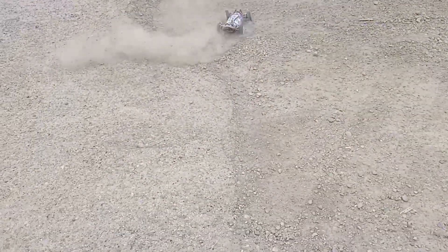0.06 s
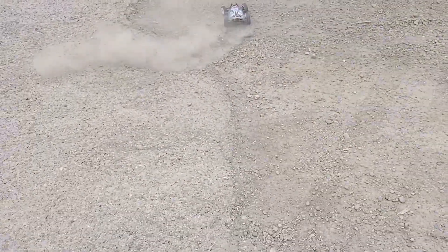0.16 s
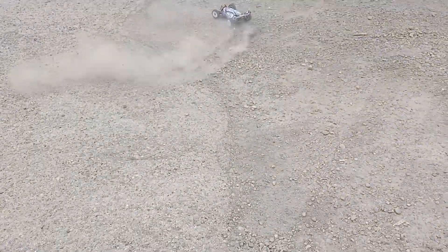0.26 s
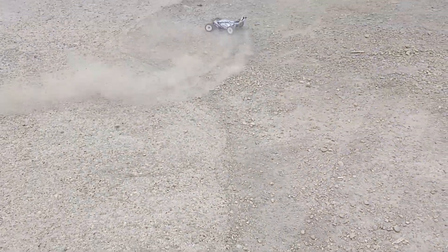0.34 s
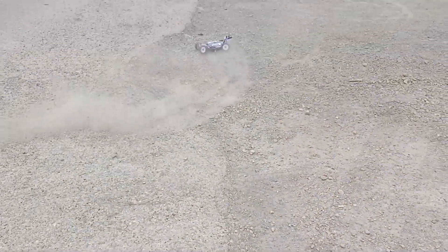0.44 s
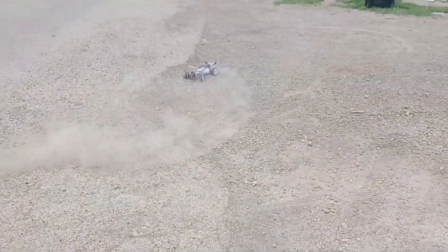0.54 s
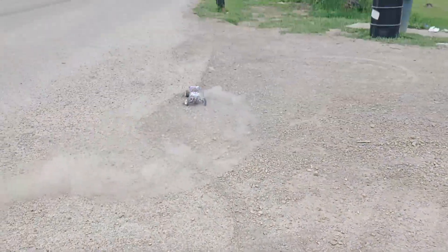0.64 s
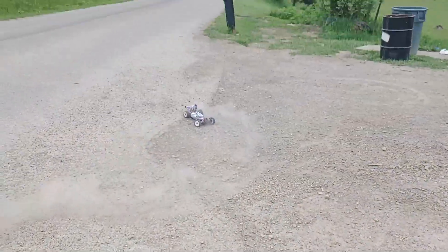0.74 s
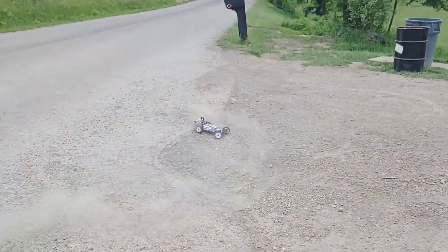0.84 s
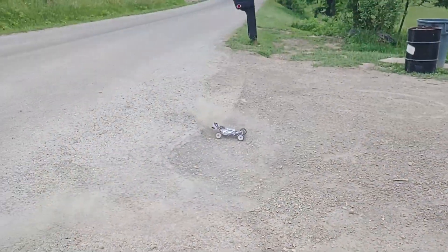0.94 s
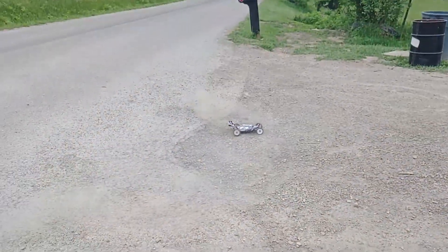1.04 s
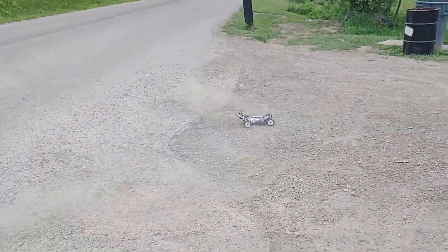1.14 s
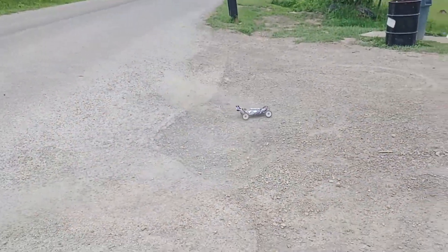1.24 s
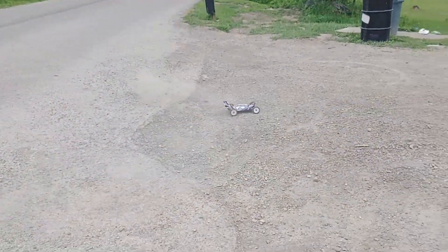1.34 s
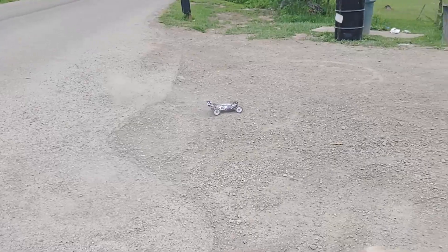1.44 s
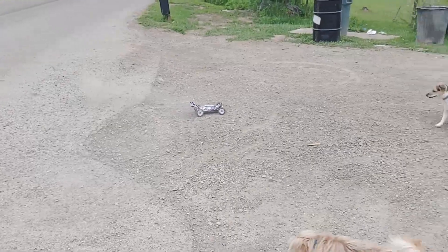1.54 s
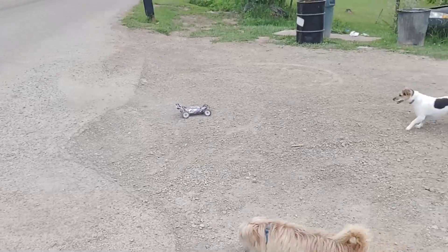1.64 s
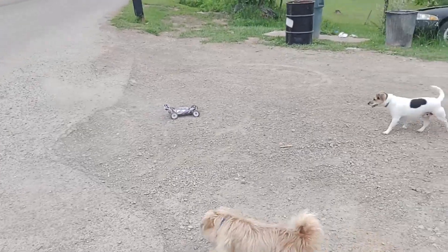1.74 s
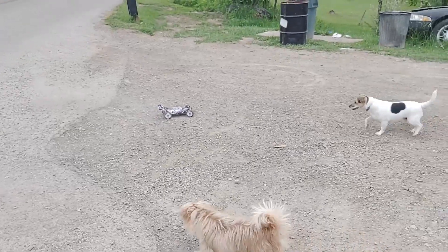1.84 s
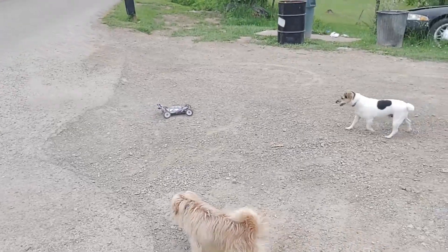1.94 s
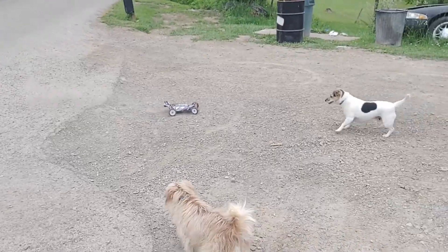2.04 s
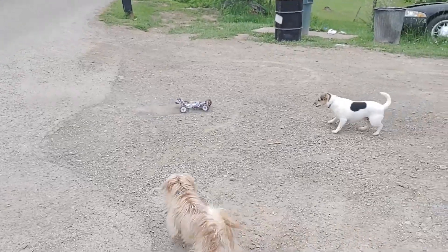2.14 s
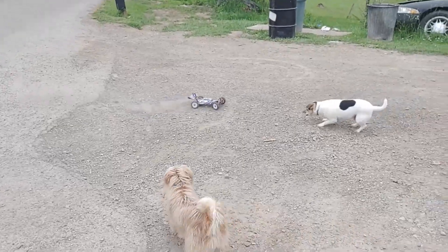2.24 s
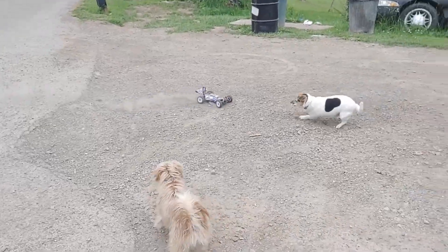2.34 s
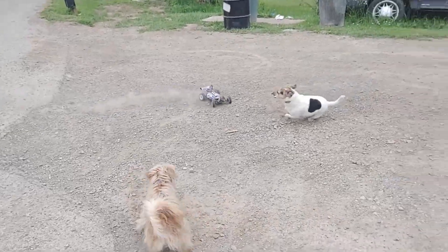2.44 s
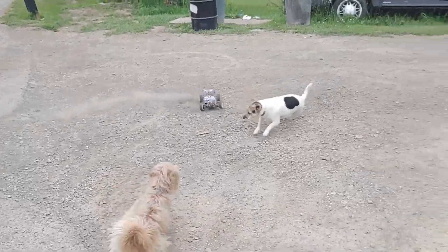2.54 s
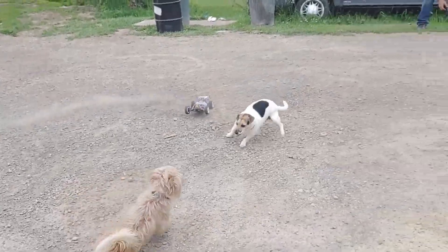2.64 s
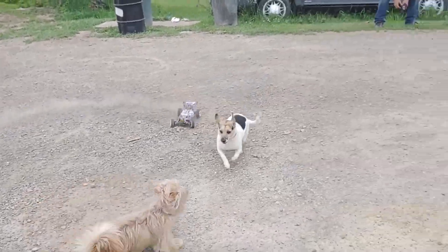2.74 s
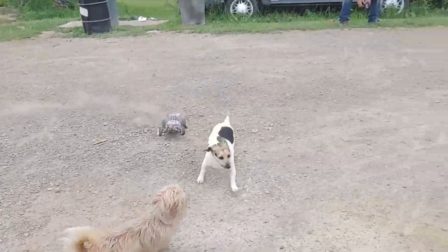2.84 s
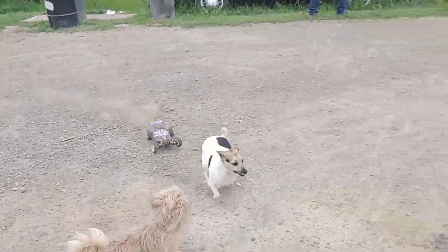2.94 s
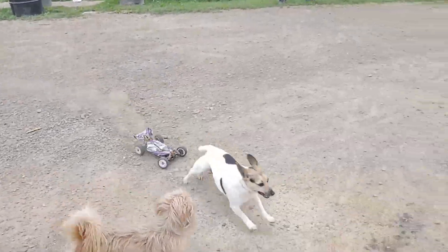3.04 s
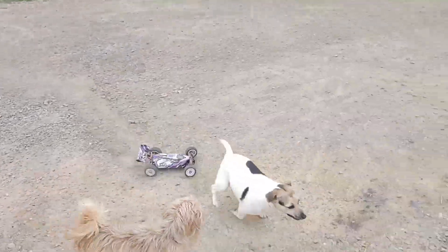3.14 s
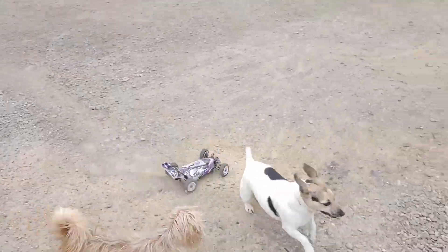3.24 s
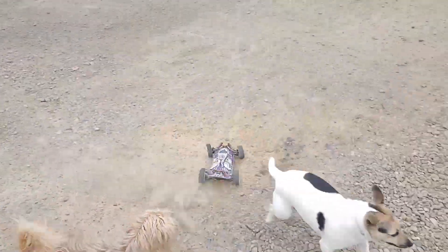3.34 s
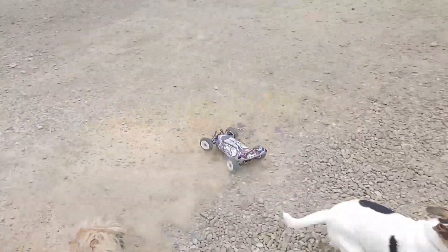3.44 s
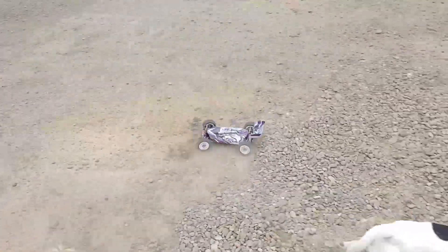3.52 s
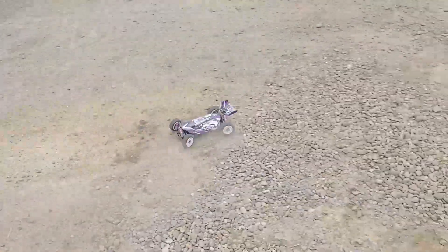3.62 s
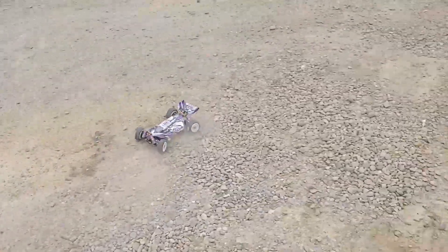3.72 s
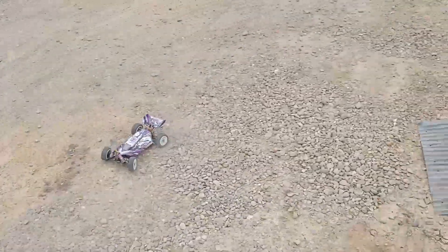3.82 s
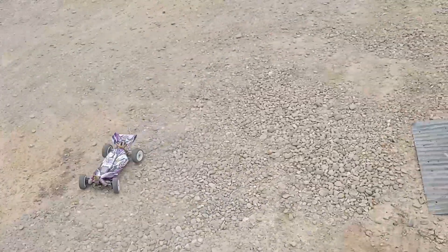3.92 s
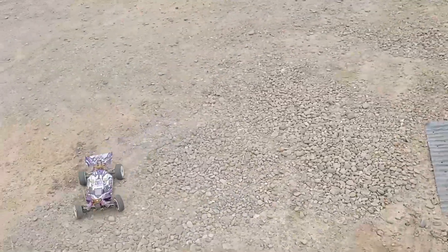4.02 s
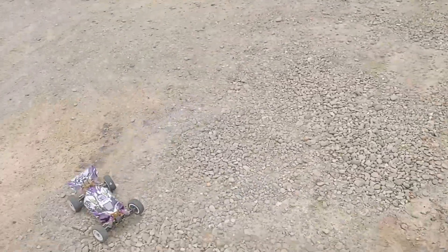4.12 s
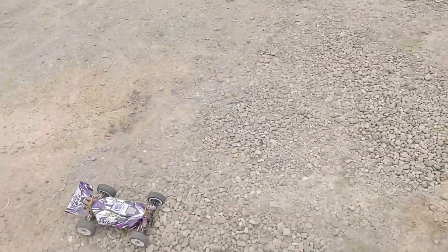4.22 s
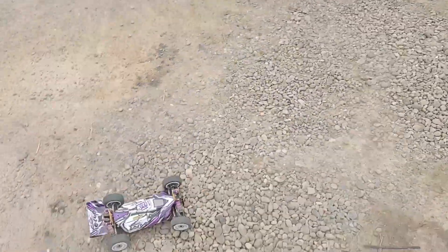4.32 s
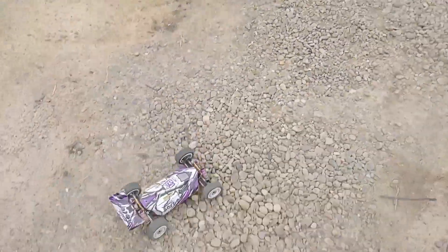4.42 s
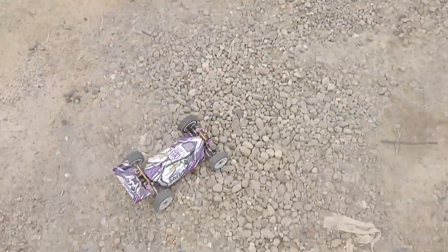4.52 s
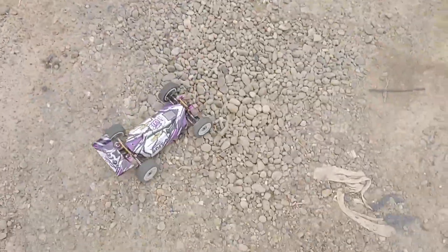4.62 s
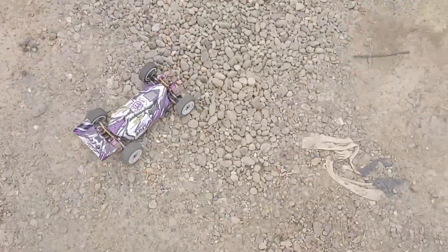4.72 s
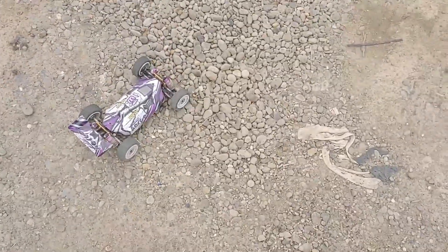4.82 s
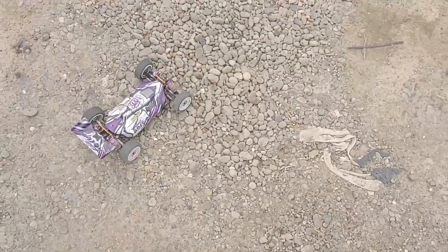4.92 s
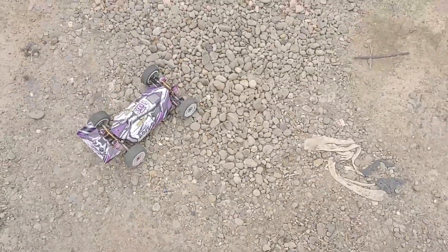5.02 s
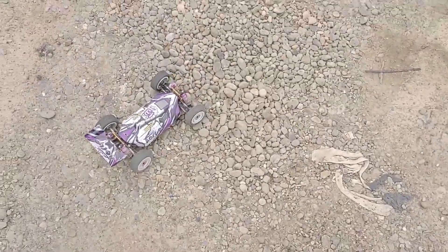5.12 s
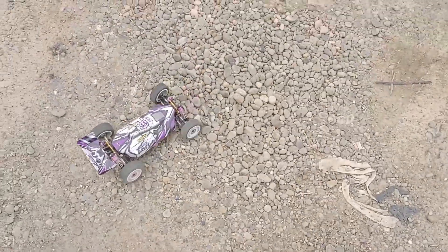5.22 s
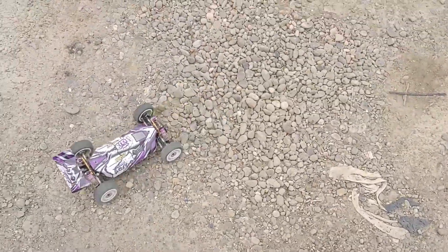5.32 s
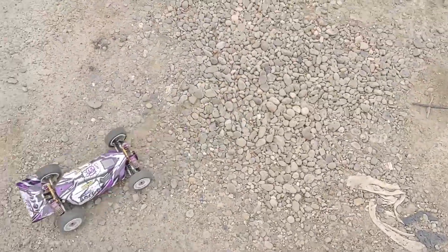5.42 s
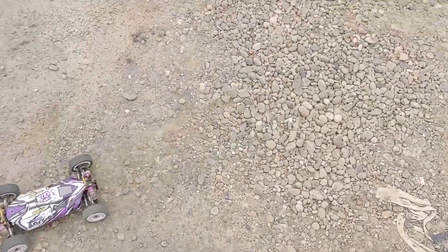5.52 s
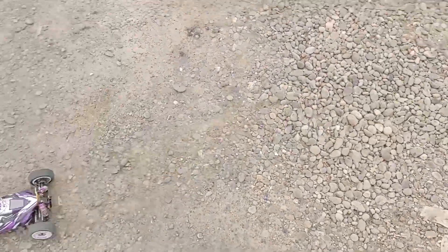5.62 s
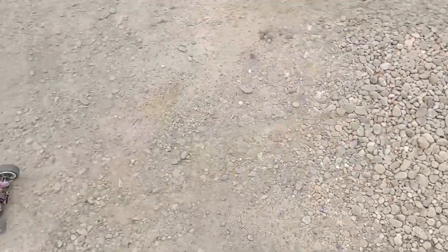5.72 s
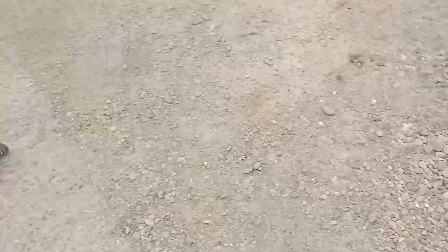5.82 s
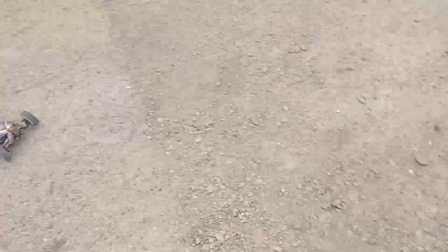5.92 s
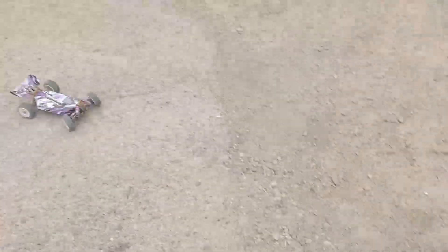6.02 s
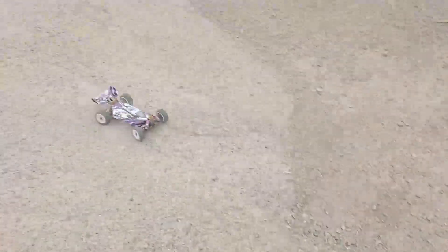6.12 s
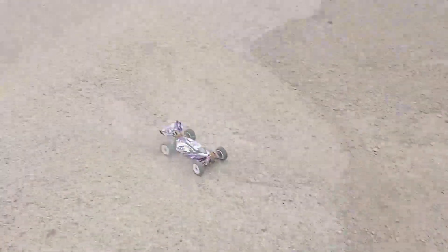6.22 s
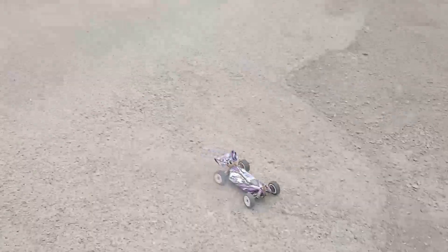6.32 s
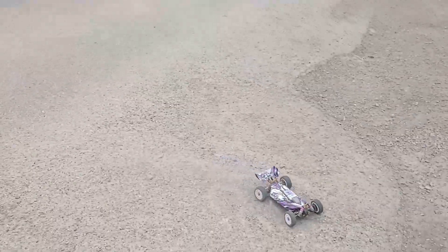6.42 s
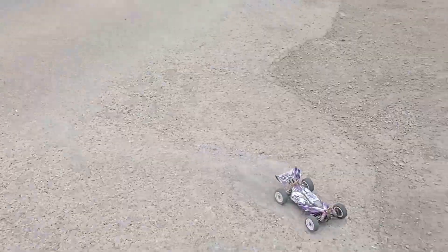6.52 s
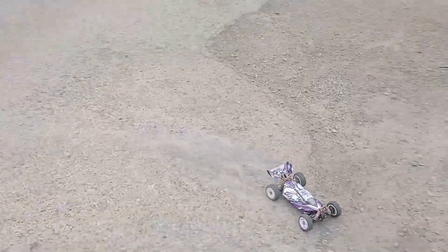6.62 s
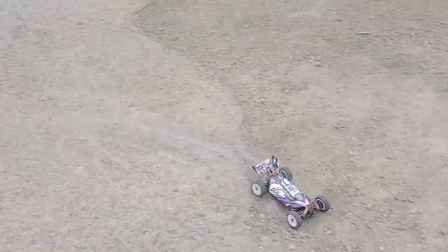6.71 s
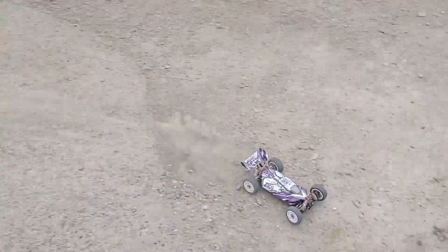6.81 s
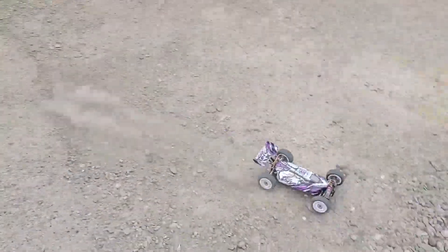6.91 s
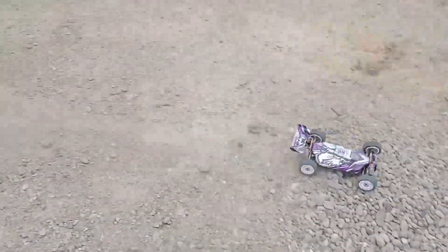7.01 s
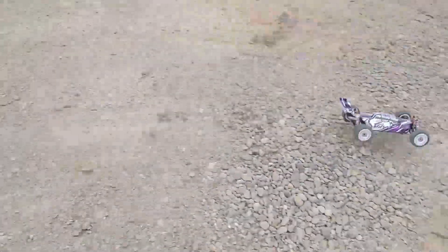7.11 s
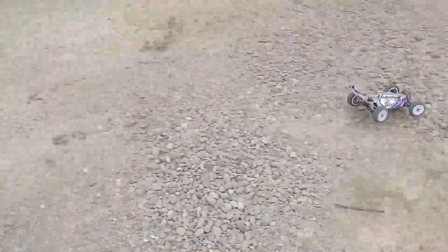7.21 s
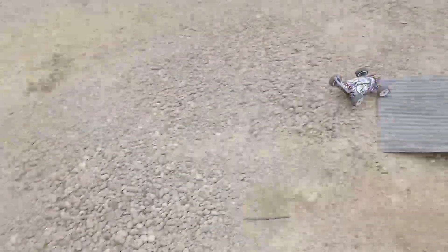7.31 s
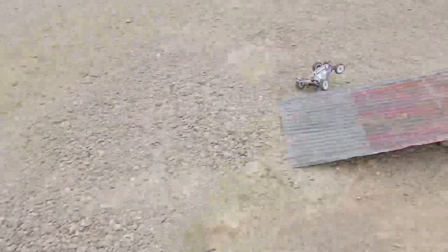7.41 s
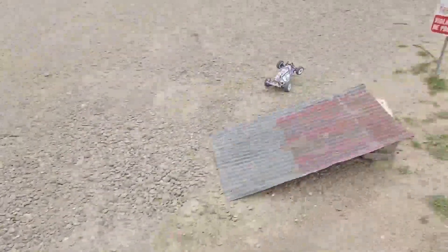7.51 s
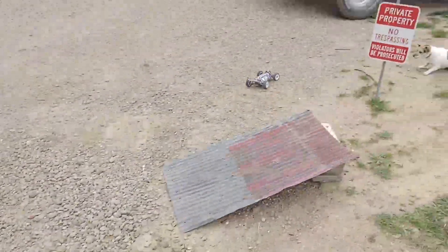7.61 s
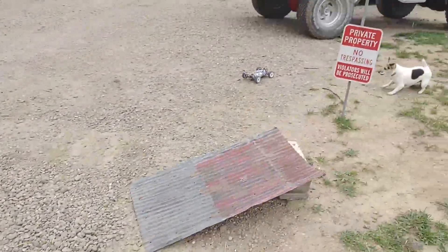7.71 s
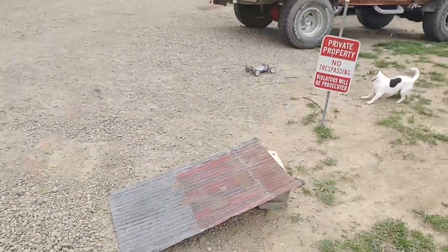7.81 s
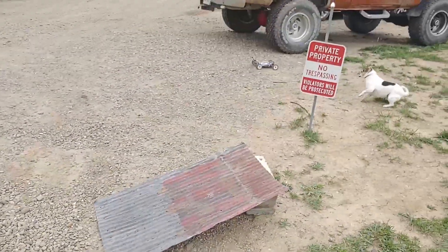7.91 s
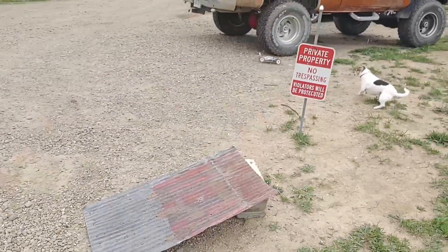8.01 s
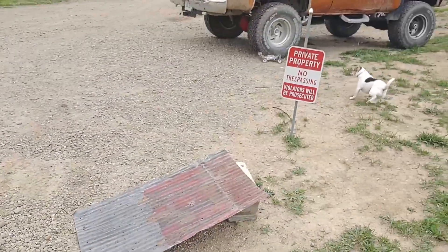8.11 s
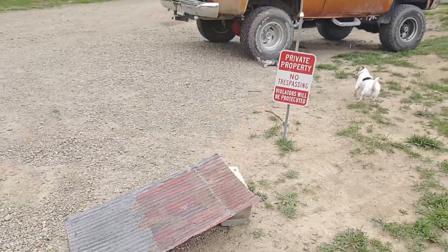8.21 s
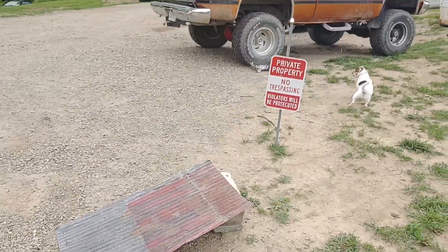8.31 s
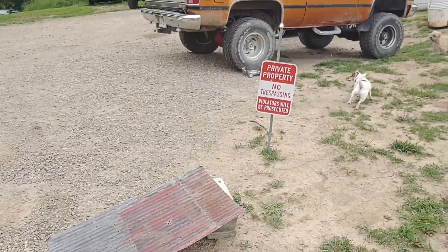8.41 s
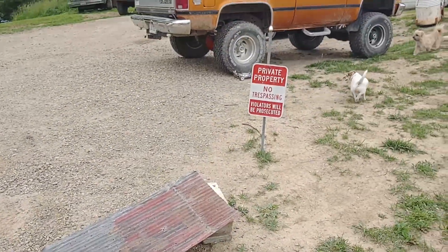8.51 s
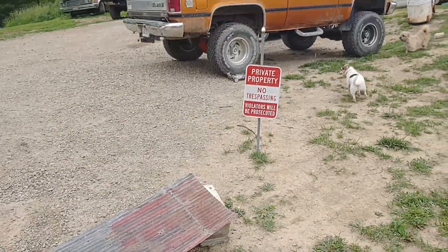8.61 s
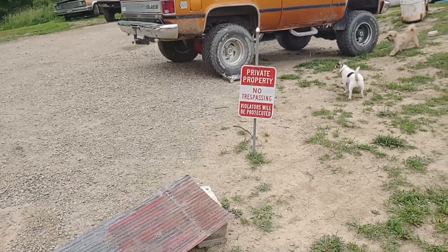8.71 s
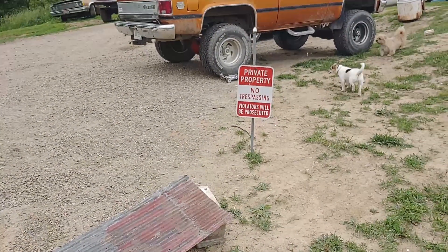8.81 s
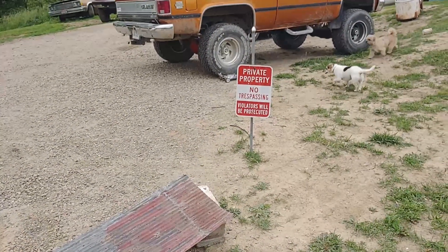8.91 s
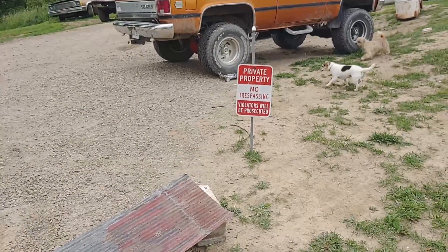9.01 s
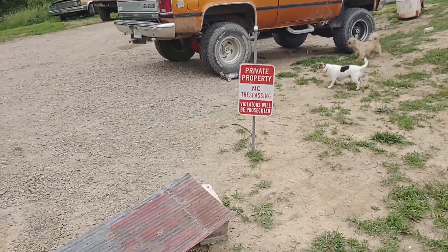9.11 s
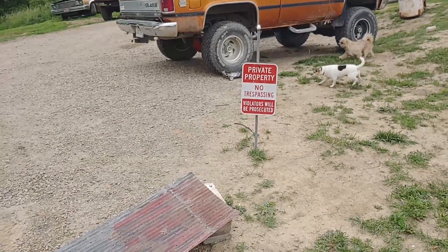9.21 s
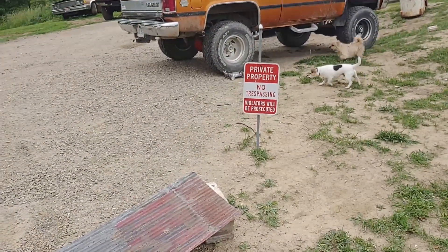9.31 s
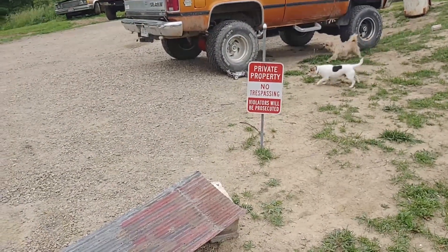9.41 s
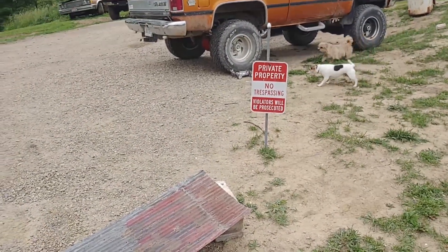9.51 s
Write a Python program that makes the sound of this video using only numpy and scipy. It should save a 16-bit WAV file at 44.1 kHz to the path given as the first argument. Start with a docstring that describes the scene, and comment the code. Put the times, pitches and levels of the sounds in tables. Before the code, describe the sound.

A small electric remote-control car skids over loose gravel outdoors, tyres rasping and stones spraying, then falls nearly silent. It whines back closer with sharp stone ticks, hollow shell knocks and dense crunches, pauses again amid tiny ticks, then takes off with a rough rising whine. A last run of hard crunches ends abruptly, leaving faint air and wind rumbling on the right of a close stereo microphone.

```python
"""A small electric buggy races, stops and turns on loose gravel outdoors, close to two microphone ports.
Shaped noise makes the shaking chassis, rasping tyres and gears, and stone spray; rough gliding tones whine.
Gritty bursts crunch, short cracks and ringing notes make stones tick, singly or in quick runs, and knock.
An inverted ground echo colours the car over quiet air; wind buffets the right port, hardest at the end."""
import sys
import numpy as np
from scipy import signal
from scipy.fft import rfft, irfft, next_fast_len
from scipy.io import wavfile
from scipy.ndimage import map_coordinates

SR = 44100
rng = np.random.default_rng(int(sys.argv[2]) if len(sys.argv) > 2 else 0)


def generate_wav(sig):
    """Save sig (samples, or channels by samples) to the path in sys.argv[1] as 16-bit PCM at SR."""
    pcm = np.round(np.clip(np.atleast_2d(sig).T, -1, 1) * 32767).astype(np.int16)
    wavfile.write(sys.argv[1], SR, pcm)


N = 421155
FFT_SIZE = next_fast_len(N)
HZ = np.maximum(np.fft.rfftfreq(FFT_SIZE, 1 / SR), 1)


def from_db(db):
    """Decibels to gain."""
    return 10 ** (np.asarray(db) / 20)


def rms_one(x):
    """Scale to rms 1."""
    return x / np.sqrt(np.mean(x ** 2) + 1e-20)


def in_time(rows):
    """Table columns read at every sample."""
    s, *columns = np.transpose(rows)
    return [np.interp(np.arange(N) / SR, s, c) for c in columns]


def colour(x, spectrum):
    """Shape white sound by a (f/Hz, level/dB) spectrum, keeping its power."""
    hz, db = np.transpose(spectrum)
    gain = from_db(np.interp(np.log(HZ), np.log(hz), db))
    return irfft(rfft(x, FFT_SIZE) * rms_one(gain), FFT_SIZE)[..., :N]


def drift(rate_hz):
    """Slow chance: noise through a double one-pole low-pass, rms 1."""
    r = np.exp(-20 * np.pi * rate_hz / SR)  # made at a tenth of the sample rate
    noise = rng.standard_normal(N // 10 + 8002)
    slow = signal.lfilter([1], [1, -2 * r, r * r], noise)[8000:]
    return np.interp(np.arange(N) / 10, np.arange(len(slow)), rms_one(slow))


def grit(per_s, spread_db, decay_ms, smooth):
    """Envelope of stone contacts at random moments, sizes long-tailed, over a smooth share; mean power 1."""
    sizes = from_db(2 * spread_db * np.minimum(rng.exponential(1, N), 4))  # as power
    struck = rng.random(N) < per_s / SR
    r = np.exp(-2000 / (decay_ms * SR))  # amplitude falls to 1/e in decay_ms
    hits = sizes * struck * SR / per_s / np.mean(sizes)
    power = signal.lfilter([1 - r], [1, -r], hits + 1e-18)
    share = np.clip(smooth, 0, 1)
    return np.sqrt(share + (1 - share) * power)


def delay(x, s):
    """Read each channel a varying time late, in seconds."""
    return np.array([map_coordinates(c, [np.arange(N) - d * SR], order=3) for c, d in zip(x, s)])


def pebbles(per_s, cycles):
    """Loose stones ring, 60 dB down after so many cycles, at pitches over four octaves; rms 1."""
    sizes = from_db(7 * np.minimum(rng.exponential(1, N), 3)) * rng.choice([-1, 1], N)
    struck = rng.random(N) < per_s / SR
    pitch_of = rng.integers(0, 18, N)
    out = 0
    for k, hz in enumerate(np.geomspace(350, 6500, 18)):
        r, w = from_db(-60 * hz / (cycles * SR)), 2 * np.pi * hz / SR
        hits = sizes * struck * (pitch_of == k) + 1e-18
        out = out + signal.lfilter([0, np.sin(w)], [1, -2 * r * np.cos(w), r * r], hits) * hz ** 0.89
    return rms_one(out)


# the car as it runs, stops and passes: relative levels of its three rolling noises
# (t/s, chassis level/dB, tyre and gear rasp level/dB, stone spray level/dB)
DRIVE_LEVELS = [(0.0, -36, -27, -37.5), (0.07, -42.5, -36.5, -35), (0.15, -33.5, -35, -39.5),
                (0.26, -40, -34.5, -35.5), (0.38, -35, -32.5, -29.5), (0.56, -39, -34, -35),
                (0.75, -38.5, -31, -31), (0.92, -49.5, -33.5, -34.5), (1.02, -36.5, -35, -41.5),
                (1.26, -61, -54, -44), (1.6, -76, -64, -58.5), (1.99, -81, -77, -67.5),
                (2.03, -57, -56, -73), (2.09, -61.5, -45.5, -75), (2.2, -46.5, -40, -62),
                (2.3, -42.5, -36.5, -43.5), (2.62, -42, -32.5, -28.5), (2.95, -43.5, -38, -33.5),
                (3.27, -36, -29.5, -28), (3.62, -36.5, -31, -29.5), (3.85, -35.5, -34.5, -36.5),
                (4.18, -39.5, -30.5, -36), (4.41, -37.5, -32, -32), (4.6, -42, -38, -32),
                (4.77, -56.5, -51.5, -39), (5.05, -64.5, -56, -56), (5.22, -59, -53, -52),
                (5.36, -46.5, -38, -42.5), (5.58, -33, -36, -32), (5.8, -44.5, -36.5, -33),
                (5.98, -42.5, -39.5, -39.5), (6.1, -44, -29, -29.5), (6.25, -53, -32.5, -32),
                (6.42, -36.5, -31, -29.5), (6.75, -35.5, -27.5, -26.5), (7.02, -31, -31, -31),
                (7.27, -47.5, -39.5, -27), (7.39, -28.5, -32, -27), (7.405, -51, -44.5, -27.5),
                (7.425, -58, -44, -32), (7.44, -48, -31.5, -28.5), (7.56, -36.5, -28.5, -33),
                (7.76, -32.5, -33.5, -33), (7.81, -42, -41.5, -37), (7.95, -43, -42, -38),
                (8.28, -43, -40, -35.5), (8.315, -49, -50, -43), (8.45, -56.5, -49.5, -51),
                (8.6, -50, -67, -66), (8.76, -63, -62, -67), (9.55, -76.5, -93.5, -103)]
# spectra of the three noises; crunches and ticks share the last two: (f/Hz, level/dB)
CHASSIS_SPECTRUM = [(50, -45), (100, -17), (200, -4), (400, -3), (550, 1), (750, -2), (1000, -7),
                    (2000, -21.5)]
RASP_SPECTRUM = [(400, -20.5), (800, -8), (1250, -4), (1650, 0), (2050, -9), (2450, -2), (2900, 1),
                 (3600, -5), (6000, -19), (12000, -29)]
SPRAY_SPECTRUM = [(1500, -41), (3000, 0.5), (5000, 4), (8000, 3), (12000, 6.5), (15000, 3), (16500, -12.5)]


def rolling():
    """Chassis, rasp and spray share the bumps of the ground; a weaker spray means fewer, lonelier stones."""
    chassis_db, rasp_db, spray_db = in_time(DRIVE_LEVELS)
    bumps = drift(18)
    stones_per_s = np.clip(400 * from_db(1.5 * (spray_db + 33.0)), 90, 3000)
    # spinning wheels add fine dust between the stones
    dust = 0.25 + 0.88 * np.clip(from_db(rasp_db + 22.5), 0, 1)
    stones = grit(stones_per_s, spread_db=1.5, decay_ms=0.35, smooth=dust)
    jolts = grit(250, spread_db=1.5, decay_ms=4.0, smooth=0.3)
    chassis = from_db(chassis_db + 0.3 + 1.2 * bumps + 1.5 * drift(30)) * jolts
    rasp = from_db(rasp_db + 0.9 + 1.1 * bumps) * jolts ** 0.4 * stones ** 0.55
    spray = from_db(spray_db - 1.0 + 1.0 * bumps) * stones
    noisy = colour(chassis * port_noise(), CHASSIS_SPECTRUM)
    noisy = noisy + colour(rasp * port_noise(), RASP_SPECTRUM)
    noisy = noisy + colour(spray * port_noise(), SPRAY_SPECTRUM)
    return noisy + from_db(rasp_db - 8 + 2.5 * bumps) * pebbles(800, cycles=30.0)


def patchy(x, patchy_db, rate_hz):
    """Gravel is uneven: every two-thirds of an octave swells and fades on its own."""
    spectrum, out = rfft(x, FFT_SIZE), 0
    place = np.clip(1.5 * np.log2(HZ / 250), 0, 9)  # band number, bands crossfading
    for k in range(10):
        band = irfft(spectrum * np.clip(1 - np.abs(place - k), 0, 1), FFT_SIZE)[:, :N]
        out = out + band * from_db(patchy_db * drift(rate_hz))
    return out


# spectrum of the quiet outdoor air: (f/Hz, level/dB)
AIR_SPECTRUM = [(180, -20), (350, -6.5), (600, -5.5), (1100, -13.5), (1800, -2), (2700, -3), (3300, -18.5),
                (3800, -34), (10700, -58.5), (16000, -43.5)]


def quiet_air():
    """Steady coloured noise, faint behind the car."""
    return from_db(-70) * colour(port_noise(), AIR_SPECTRUM)


# gusts on the right port: (start t/s, end t/s, relative level/dB)
GUST_TIMES = [(0, .25, -57.5), (1.507, 1.736, -62), (3.106, 3.25, -59), (3.807, 3.885, -60),
              (4.452, 4.53, -52.5), (6.732, 7.4, -49), (7.92, 8.14, -50.5), (8.424, 8.5, -48),
              (8.534, 9.6, -35.5)]
# spectrum of wind on a port: (f/Hz, level/dB)
GUST_SPECTRUM = [(30, -27), (60, -11), (90, 0), (125, -3), (220, -10.5), (370, -30.5), (600, -41.5),
                 (1500, -70.5)]


def wind():
    """Lumpy turbulence on the exposed right port, a faint rumble on the left."""
    calm_db, rise_db_s, fall_db_s = -72.5, 64.5, 38
    t = np.arange(N) / SR
    gusts = [db - rise_db_s * np.maximum(t0 - t, 0) - fall_db_s * np.maximum(t - t1, 0)
             for t0, t1, db in GUST_TIMES]
    right_db = np.maximum(np.max(gusts, axis=0), calm_db)
    left_lumps_db = 0.33 * right_db - 45.5 + 5.0 * drift(11.0)
    right_lumps_db = right_db + 2.5 + 3.5 * drift(22)
    lumps = from_db([left_lumps_db, right_lumps_db])
    return colour(lumps * rng.standard_normal((2, N)), GUST_SPECTRUM)


# rough tones of motor, gears and chassis, one row a glide:
# (start t/s, end t/s, first f/Hz, last f/Hz, relative peak level/dB)
WHINE_GLIDES = [(0.05, 1.15, 5400, 5300, -45), (2.35, 2.75, 5000, 4900, -41), (2.8, 3.15, 4950, 5350, -36),
                (4.22, 4.42, 4800, 4950, -35), (5.45, 5.8, 4200, 5100, -37), (6.03, 6.42, 3900, 8000, -36),
                (6.75, 7.0, 4800, 5000, -38), (5.23, 5.45, 570, 545, -44), (5.4, 6.24, 520, 500, -37),
                (3.84, 4.0, 4050, 3900, -39), (5.78, 5.95, 4400, 3100, -40), (7.24, 7.33, 1530, 1620, -37),
                (2.04, 2.45, 620, 600, -46), (2.04, 2.4, 2850, 2950, -48), (2.06, 3.2, 1600, 1500, -39),
                (3.45, 3.7, 1300, 1230, -36), (4.38, 4.55, 450, 460, -41), (6.03, 6.24, 2950, 3300, -28),
                (6.17, 6.32, 2750, 3000, -29), (6.25, 6.66, 3150, 2900, -27), (6.1, 6.42, 1450, 1600, -36),
                (6.5, 6.95, 3200, 2500, -35), (6.3, 7.0, 1000, 1270, -34), (7.5, 7.62, 2150, 2050, -35),
                (7.48, 7.6, 3000, 2700, -32), (7.43, 7.8, 240, 212, -37), (8.22, 8.29, 540, 551, -34)]


def whine():
    """Each tone glides in pitch and is blurred by backlash and wheel slip into a rough band."""
    peak_at, edge_db = 0.35, -7  # peaks this far into its glide, this much softer at both ends
    out = np.zeros(N)
    for t0, t1, first, last, peak_db in WHINE_GLIDES:
        blur_hz = 4.3 * ((first + last) / 2) ** 0.5
        hz, = in_time([(t0, first), (t1, last)])
        db, = in_time([(t0 - 0.03, -130), (t0, peak_db + edge_db), (t0 + peak_at * (t1 - t0), peak_db),
                       (t1, peak_db + edge_db), (t1 + 0.04, -130)])
        phase = 2 * np.pi * np.cumsum(hz * (1 + 0.02 * drift(30))) / SR
        db = db + 3.5 * drift(60)
        out += from_db(db) * (drift(blur_hz) * np.sin(phase) + drift(blur_hz) * np.cos(phase))
    return out


# single stones striking: (t/s, relative level/dB, treble share level/dB)
STONE_TICKS = [(0.089, -3.5, 0), (0.219, -1.5, -4.5), (0.681, -10, 0), (0.878, -8, 0), (0.999, -12.5, 0),
               (1.172, -9.5, -5), (1.258, -27, 0), (1.306, -23, -11), (1.389, -24, 0), (2.631, -6, -3),
               (2.710, 0.5, -10), (2.828, -16.5, -12), (3.075, -15, 0), (3.09, -7, -2), (3.218, -6, 4),
               (3.268, -13, 0), (3.329, 0.5, -13), (3.363, 1, -15), (3.387, -5.5, 0), (3.407, -23, 0),
               (3.443, -23, 0), (3.468, -8, 0), (3.514, -3.5, -0.5), (3.586, -1.5, -4), (3.656, -12, 4),
               (3.695, -6, 0), (3.783, -2, -11), (4.165, -1, -1), (4.382, -10, 1), (4.428, -2, -4),
               (4.513, -4.5, -0.5), (4.605, -9, 0), (4.612, -7, 0), (4.651, -13.5, 0), (4.664, -11, 0),
               (4.68, -12, -4.5), (4.7, -2, -0.5), (4.711, -14, 0), (4.746, -8.5, 0), (4.764, -16, -2.5),
               (4.796, -26, 0), (4.802, -23, 0), (4.815, -20, 1), (4.825, -20, 0), (4.84, -16, -12),
               (4.862, -22, 0), (4.878, -28, 4), (4.909, -25, 0), (4.921, -16, 0), (4.948, -25, 0),
               (4.956, -25, 0), (4.998, -18, -9), (5.041, -31, 0), (5.106, -30, 0), (5.144, -26.5, 0),
               (5.165, -28, 0), (5.26, -25, 0), (5.518, -14, 0), (5.735, 4.5, -7.5), (5.769, -1, -.5),
               (5.925, -16, 0), (6.777, 5, -22), (6.887, -8.5, 0), (7.072, -2.5, -6), (7.34, -4.5, 0),
               (7.373, -4, 2), (7.384, 5, -1.5), (7.712, -1, 0), (7.917, -17, -10), (7.963, -7, -10),
               (8.003, -1, 2), (8.075, -16, -2), (8.1, -14, 3.5), (8.388, -14, -4), (8.422, -20, -3),
               (8.557, -28, -9), (8.708, -30, -4), (8.723, -32, 0), (8.995, -47, 3)]


def ticks():
    """A struck stone gives a dry crack of a millisecond or two, bright and dull, and a short dull-side note."""
    low_hz, high_hz, ring_cycles, ring_db = 2000, 3400, 5.0, -14  # a note falls to 1/e in these cycles
    dull, bright, note = np.zeros(N), np.zeros(N), np.zeros(N)
    t = np.arange(SR // 25) / SR
    crack = np.exp(-t / 0.0012)
    rows = STONE_TICKS + quick_ticks()
    pitches = low_hz * (high_hz / low_hz) ** rng.random(len(rows))
    for (s, peak_db, treble_db), hz in zip(rows, pitches):
        at = slice(int(s * SR), int(s * SR) + len(t))
        share = np.clip(from_db(treble_db), 0, 0.98)
        swell = from_db(peak_db) * (1 - np.exp(-t / 0.00056))
        dull_swell = swell * np.sqrt(1 - share ** 2)
        ring = np.exp(-t * hz / ring_cycles) * np.sin(2 * np.pi * hz * t)
        bright[at] += swell * share * 0.98 * crack
        dull[at] += dull_swell * 0.49 * crack
        note[at] += dull_swell * from_db(ring_db) * ring
    return colour(bright * port_noise(), SPRAY_SPECTRUM) + colour(dull * port_noise(), RASP_SPECTRUM) + note


# wheels ploughing into gravel:
# (peak t/s, relative peak level/dB, treble share level/dB, build-up t/s, 60 dB decay t/s)
WHEEL_CRUNCHES = [(0.091, -9.5, -6, 0.0012, 0.81), (0.348, -4.5, -6.5, 0.031, 0.064),
                  (0.606, -6, -4.5, 0.012, 0.048), (0.965, -13, -4, .006, 0.39),
                  (1.065, -13.5, -20, 0.0088, 0.04), (1.321, -9, -0.5, 0.0006, 0.18),
                  (1.36, -32, -17, 0.016, 0.35), (1.437, -22, -9, 0.0028, 0.044),
                  (2.885, -16.5, -8, 0.011, 0.064), (2.904, -5.5, -2, 0.012, 0.051),
                  (3.489, -4, -2, 0.0059, 0.91), (3.676, 5.5, -3, 0.019, 0.023), (3.801, 4, 0, 0.023, 0.14),
                  (3.824, 2, -1, .001, 0.13), (3.946, 1, -1.5, 0.0037, 0.23),
                  (4.005, -0.5, 0, 0.0006, 0.18), (4.085, 1, 0, .001, 0.12), (4.131, 3, -1, 0.00065, 0.23),
                  (4.231, -1.5, -1.5, 0.0027, 0.18), (4.404, -1, -1.5, 0.009, 0.11),
                  (4.533, -6, 0, 0.0015, 0.044), (5.372, -11.5, -4, 0.0032, 0.21),
                  (5.52, -11, -9, 0.011, 0.13), (7.14, -4.5, -0.5, 0.029, 0.2),
                  (7.16, -11.5, -3, 0.0094, .08), (7.394, -4.5, 0, 0.069, 0.026),
                  (7.509, 4.5, 0.5, 0.0063, 0.087), (7.607, -3.5, -4.5, 0.0056, 0.32),
                  (7.63, -14, -10.5, 0.011, 0.11), (7.77, -5.5, -0.5, 0.0066, 0.14),
                  (7.893, -2, -.5, 0.013, 0.28), (8.003, 2, 0, 0.0015, 0.16),
                  (8.15, 1.5, -.5, 0.0026, 0.15), (8.218, -8.5, -1, 0.00083, 0.069),
                  (8.257, -9, 0, 0.00084, 0.067), (8.556, -29, -23, .0006, 0.44)]


def crunches():
    """Each crunch builds up, peaks and dies away in gritty pieces, with a dull and a bright part."""
    dull, bright, t = np.zeros(N), np.zeros(N), np.arange(N) / SR
    for s, peak_db, treble_db, rise, t60 in WHEEL_CRUNCHES:
        at = slice(max(int((s - 0.1) * SR), 0), int((s + 0.12) * SR))  # cut off 0.12 s after the peak
        share = np.clip(from_db(treble_db), 0, 0.98)
        late = t[at] - s
        build_up = np.exp(late / max(rise, 1e-4))
        decay = from_db(-60 * late / max(t60, 0.01))
        shape = np.where(late < 0, build_up, decay)
        dull[at] += from_db(peak_db - 16) * shape * np.sqrt(1 - share ** 2)
        bright[at] += from_db(peak_db - 17.5) * shape * share
    pieces = grit(1500, spread_db=3, decay_ms=1.1, smooth=0.6)
    dull_part = colour(dull * pieces * port_noise(), RASP_SPECTRUM)
    return dull_part + colour(bright * pieces * port_noise(), SPRAY_SPECTRUM)


# stones knocking on the hollow shell of the car: (t/s, relative level/dB, f/Hz)
SHELL_KNOCKS = [(0.176, -12, 2480), (0.199, -11, 1740), (0.638, -16, 2750), (1.17, -13, 2840),
                (2.393, -12, 1640), (2.632, -7, 1600), (2.827, -19.5, 1500), (3.328, -2.5, 1780),
                (3.362, -7.5, 2730), (3.414, -15, 2000), (3.488, -6.5, 2500), (3.599, -8.5, 2610),
                (3.67, -9.5, 2770), (3.783, -10.5, 1110), (3.794, -12, 372), (4.384, -9, 2100),
                (4.444, -5.5, 2480), (4.512, -16.5, 480), (4.606, -10.5, 3020), (4.631, -14.5, 2730),
                (4.701, -21, 3000), (4.967, -26, 3020), (5.329, -26, 555), (5.898, -10.5, 3740),
                (6.197, -6.5, 3460), (6.363, -19, 3060), (7.069, -5, 2220), (7.317, -12, 1680),
                (7.383, -15.5, 1730), (7.48, -21, 320), (7.605, -7, 2750), (7.712, -23, 720),
                (7.769, -9, 2570), (7.917, -13, 2770), (7.963, -6.5, 2550), (7.992, -14, 1740),
                (8.007, -8, 1840), (8.074, -18, 1830), (8.224, -17.5, 527), (8.556, -26.5, 2010)]


def knocks():
    """Each knock rings a few cycles on its own pitch and one inharmonic overtone."""
    ring_cycles, overtone, overtone_db = 4.7, 1.8, -13  # 1/e in these cycles; overtone's pitch ratio
    out, t = np.zeros(N), np.arange(SR // 20) / SR
    for s, peak_db, hz in SHELL_KNOCKS:
        note = np.sin(2 * np.pi * hz * t)
        note = note + from_db(overtone_db) * np.sin(2 * np.pi * hz * overtone * t)
        at = slice(int(s * SR), int(s * SR) + len(t))
        out[at] += from_db(peak_db - 5.5) * note * np.exp(-t * hz / ring_cycles)
    return out


# runs of small stones ticking in quick succession, as the car drives or after it quiets:
# (start t/s, end t/s, first relative level/dB, last relative level/dB)
QUICK_RUNS = [(1.192, 1.8, -43, -78), (4.267, 4.562, -13.5, -9.5), (4.745, 5.303, -48, -36),
              (7.803, 8.104, -14.5, -9), (8.395, 8.805, -33.5, -45)]


def quick_ticks():
    """Tick rows drawn by chance: small stones strike at uneven gaps while the run's level glides."""
    rows = []
    for t0, t1, first_db, last_db in QUICK_RUNS:
        when, size, tone = rng.random((40, 3)).T
        s = t0 + np.cumsum(0.47 + 1.6 * when) / 52  # gaps of 9 to 40 ms
        glide_db = first_db + (last_db - first_db) * (s - t0) / (t1 - t0)
        db = glide_db + 4 * (2 * size - 1)
        treble_db = -6 * tone
        rows += list(np.c_[s, db, treble_db][s < t1])
    return rows


# where the car is: (t/s, ground echo's extra path/ms, echo strength 0-1, left port's extra lead/us,
# treble left-right level/dB)
CAR_PLACE = [(0, 0.5, 0, 4, 4), (1.1, 0.51, 0.41, -37.5, 3), (2.9, 0.6, 0.12, 1.5, -1.5),
             (3.4, 1.4, 0.01, 26, -1), (4.6, 1.18, 0.09, 51, -0.5), (5.6, 0.43, 0.2, 62, 1),
             (6.0, 0.5, 0.38, 161, -2), (6.15, 0.69, 0, -100, 1.5), (6.6, 0.97, 0.3, -84, -1.5),
             (7.2, 1.38, 0.08, -96, -1.5), (8.2, 1.53, 0.1, -8.5, 0), (9.55, 1.9, 0.11, 28, -4)]


def ground(x):
    """The longer ground path returns inverted and dulled; the car's bearing shifts and shades the ports."""
    shadow_hz = 5500  # above this the body of the recorder shades the far port
    ms, strength, lead_us, shade_db = in_time(CAR_PLACE)
    dulled = signal.lfilter(*signal.butter(1, 6000, fs=SR), x)
    late = delay(dulled, [ms / 1000] * 2)
    with_echo = (x - strength * late) / np.sqrt(1 + strength ** 2)
    both = delay(with_echo, [-lead_us / 2e6, lead_us / 2e6])
    treble = signal.filtfilt(*signal.butter(2, shadow_hz, "high", fs=SR), both)
    return both + treble * (from_db([shade_db / 2, -shade_db / 2]) - 1)


# the two microphone ports: (f/Hz, likeness 0-1, left's phase lead/rad, left-right level/dB)
PORT_PAIR = [(60, 0.99, 0.5, -0.5), (250, 1, 0.5, 0), (1000, 0.89, 0.5, 2), (2100, 0.63, 0.23, -3.5),
             (2750, 0.2, 1.26, -9.5), (3500, .85, 2.6, -3.5), (3870, 0.95, 3.2, 0.5), (4550, 0.95, 3.3, 1),
             (5250, 0.7, 5.8, -1), (5720, 0, 8.5, 2), (6670, 0.05, 9, 2.5), (15000, 0.1, 19, -0.5)]


def ports(x):
    """Each port has its own colour and lag; near four kilohertz the pair is about in antiphase."""
    hz, _, lead, balance_db = np.transpose(PORT_PAIR)
    half = from_db(np.interp(HZ, hz, balance_db) / 2) * np.exp(0.5j * np.interp(HZ, hz, lead))
    return irfft(rfft(x, FFT_SIZE) * [half, 1 / half], FFT_SIZE)[:, :N]


def port_noise():
    """White noise at both ports: alike in the bass and near 4 kHz, unalike near 2.75 and above 5.7 kHz."""
    hz, likeness, _, _ = np.transpose(PORT_PAIR)
    alike = np.clip(np.interp(HZ, hz, likeness), 0, 1)
    shared, left, right = rfft(rng.standard_normal((3, N)), FFT_SIZE)
    both = np.sqrt(alike) * shared + np.sqrt(1 - alike) * np.array([left, right])
    return irfft(both, FFT_SIZE)[:, :N]


def scene():
    """Car, stones and quiet air reach the ports; wind acts on them directly."""
    gravel = patchy(rolling() + crunches(), patchy_db=2.5, rate_hz=24.8)
    car = gravel + ticks() + knocks() + whine()
    return ports(ground(car) + quiet_air()) + wind()


def band_limit(x):
    """A steep low-pass at the top of the band."""
    return signal.sosfilt(signal.butter(12, 16990, fs=SR, output="sos"), x)


def record(dry):
    """Peaks are rounded, then the deepest bass and the top are cut."""
    rounded = np.tanh(1.485 * dry)
    bass_cut = signal.butter(2, 45, "high", fs=SR, output="sos")
    top_cut = signal.cheby2(12, 80, 16600, fs=SR, output="sos")
    mix = signal.sosfilt(np.vstack([bass_cut, top_cut]), rounded)
    return band_limit(mix)


dry = scene()
out = record(dry)
generate_wav(out)
```